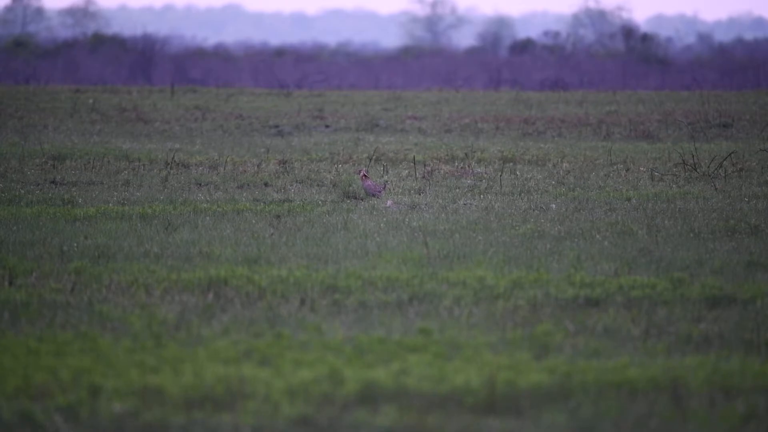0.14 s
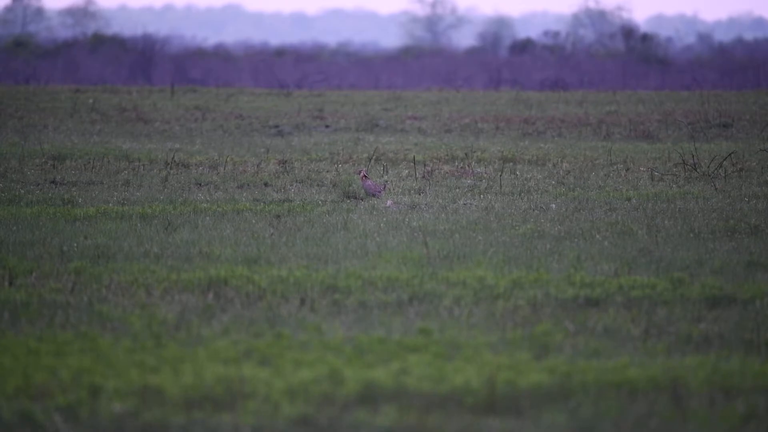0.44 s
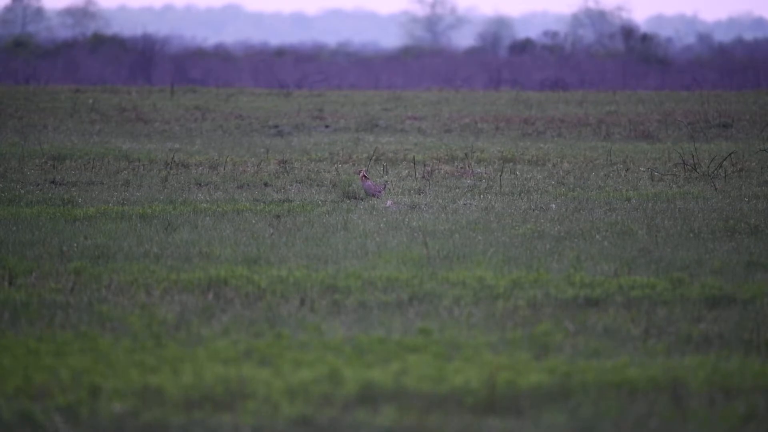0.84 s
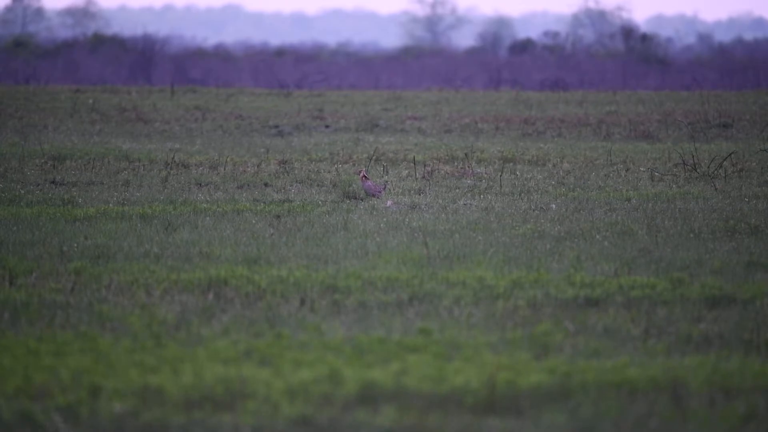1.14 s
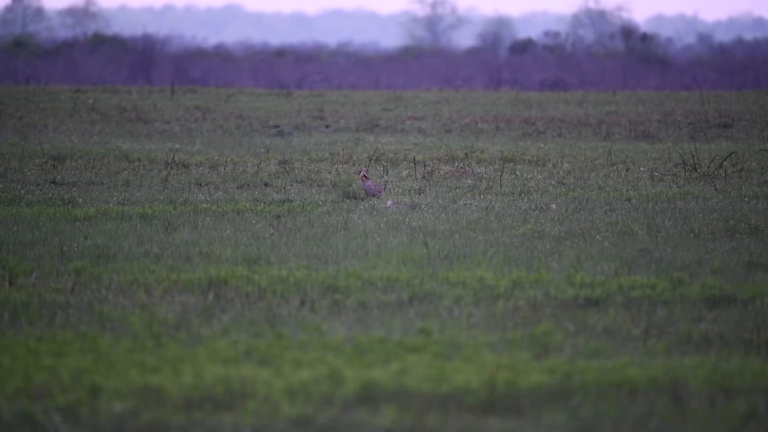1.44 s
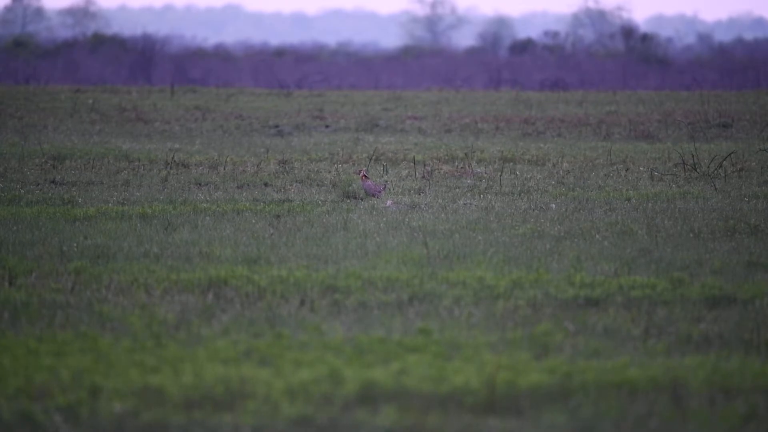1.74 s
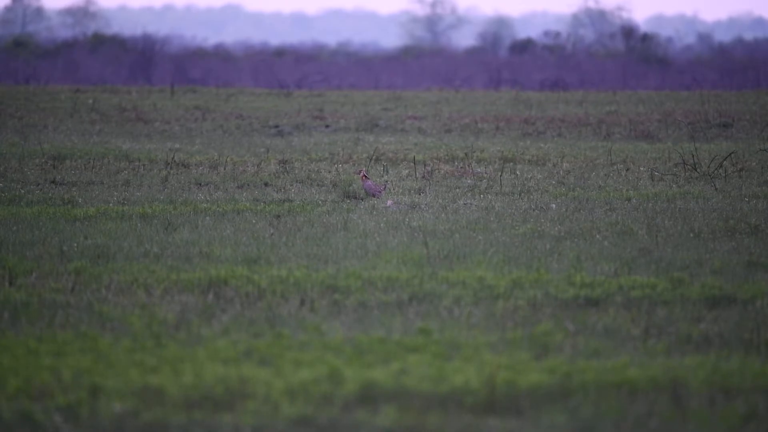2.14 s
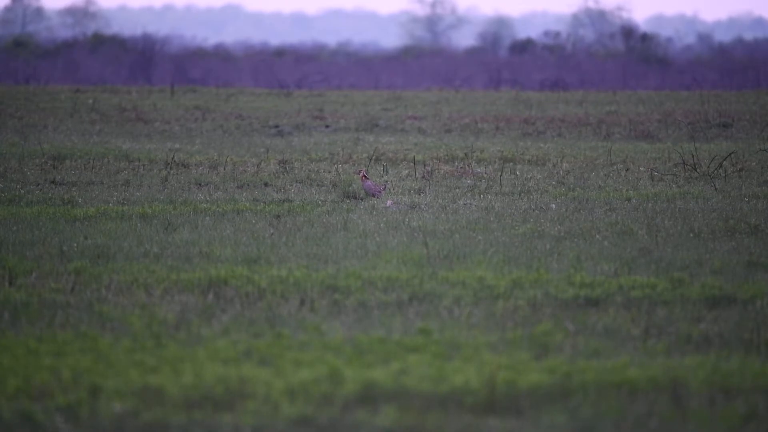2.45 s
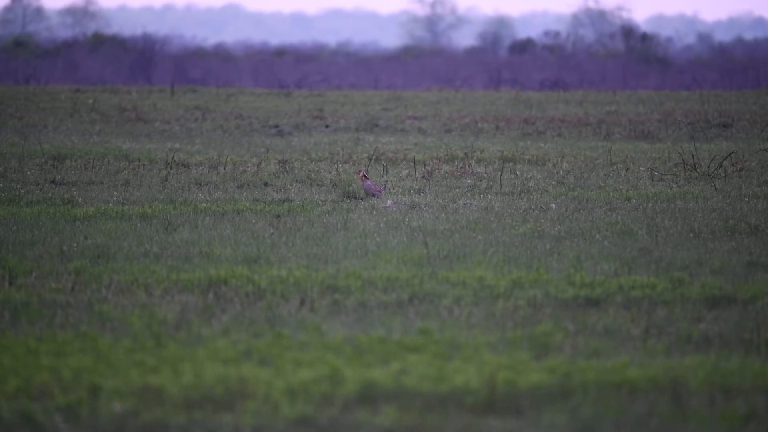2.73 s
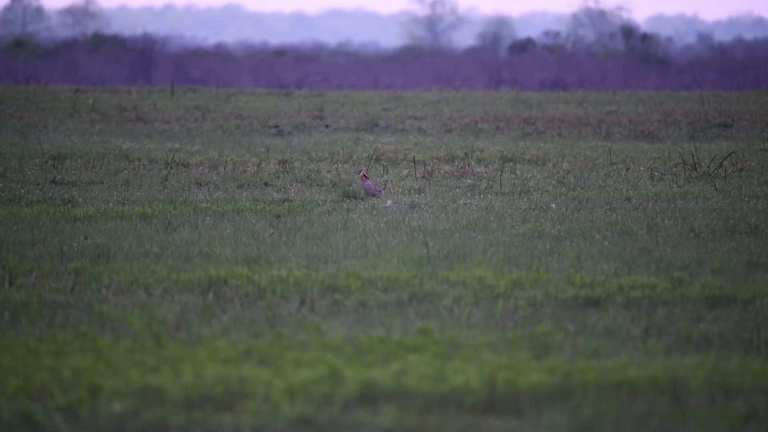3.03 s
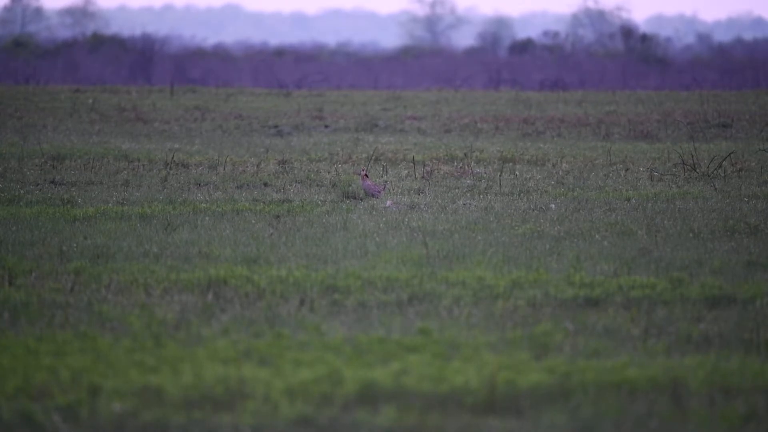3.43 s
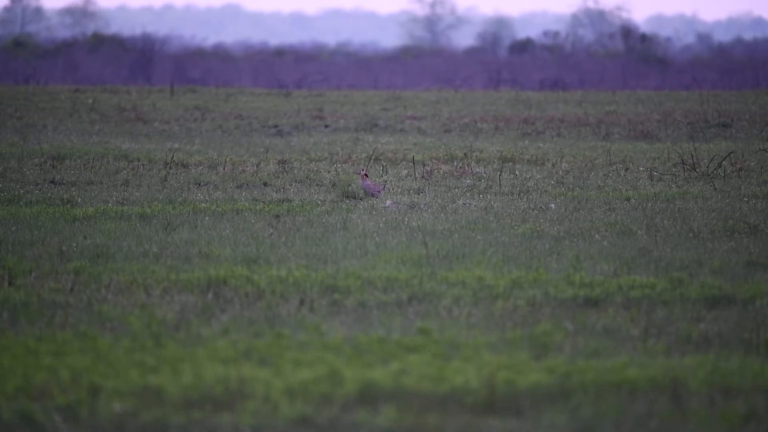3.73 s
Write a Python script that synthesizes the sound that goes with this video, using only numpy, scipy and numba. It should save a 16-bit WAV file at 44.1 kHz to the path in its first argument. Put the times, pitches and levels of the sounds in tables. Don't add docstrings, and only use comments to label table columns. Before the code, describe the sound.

Strong wind buffets a bare stereo microphone in an open field, thumping and crackling with overload; faint reedy bird calls, thin whistles and a cricket trill lie far behind, clearer as the wind eases before gusting again.

```python
import sys
import numpy as np
from scipy import signal
from scipy.fft import rfft, irfft
from scipy.io import wavfile
from scipy.ndimage import uniform_filter1d
from numba import njit

SR = 44100
rng = np.random.default_rng(int(sys.argv[2]) if len(sys.argv) > 2 else 0)


def dump_mix(stems):
    frames = np.atleast_2d(stems).T
    limited = np.clip(frames, -1, 1)
    pcm = np.round(limited * 32767).astype(np.int16)
    wavfile.write(sys.argv[1], SR, pcm)


def volts_from_decibels(level):
    exponent = np.asarray(level, float) / 20
    return 10 ** exponent


N = 171108


@njit
def svf(x, hz, k):
    y, b, l = np.empty((3, len(x))), 0., 0.
    for i in range(len(x)):
        g = np.tan(np.pi * hz[i] / SR)
        v = (b + g * (x[i] - l)) / (1 + g * (g + k))
        low = l + g * v
        y[0, i], y[1, i], y[2, i] = low, k * v, x[i] - k * v - low
        b, l = 2 * v - b, 2 * low - l
    return y


def tone(x, hz, damp, order):
    return svf(x, hz + np.zeros(N), 1. * damp)[order]


def unit(x):
    return x / np.sqrt(np.mean(x ** 2))


def smooth_twice(x, size):
    return uniform_filter1d(uniform_filter1d(x, size), size)


def walk(rate):
    hold = int(SR / rate)
    levels = np.repeat(rng.standard_normal(N // hold + 1), hold)
    return unit(smooth_twice(levels, hold)[:N])


def gate(t, start, length, edge):
    inside = np.minimum(t - start, start + length - t)
    return np.sin(np.pi / 2 * np.clip(inside / edge, 0, 1)) ** 2


def placed(x, pan_db, lag_s):
    late = np.roll(x, int(round(lag_s * SR)))
    return np.array([x * volts_from_decibels(pan_db / 2), late * volts_from_decibels(-pan_db / 2)])


def wind(t, eddies):
    calm_db = -35
    buffet_db, buffet_slope = -9, 0.75
    rumble_db, rumble_slope, rumble_hz, swell_db = -22, 0.3, 63.7, 3
    rustle_db, rustle_slope, rustle_hz = -47, 1, 580
    flutter_db, flutter_slope, flutter_hz = -27, .7, 260
    eddy_hz, eddy_oct_per_db, port_hz = 236, 0.09, 111.4
    steady = .7

    coarse_t = t[::44]
    gusts = sum(volts_from_decibels(db) * np.exp(-.5 * ((coarse_t - s) / w) ** 2) for s, db, w in eddies)
    force = 20 * np.log10(volts_from_decibels(calm_db) + gusts)
    force = np.interp(t, coarse_t, force) + 1.324 * walk(90)
    hz = eddy_hz * 2 ** (eddy_oct_per_db * force + 0.15 * walk(60))
    noise = rng.standard_normal((3, N))

    buffet = tone(noise[0] / np.sqrt(hz), hz, 1.0, order=0)
    buffet = tone(buffet, 1.648 * hz, 0.83, order=0)
    buffet = buffet / (smooth_twice(buffet ** 2, 700) + 1e-12) ** (steady / 2)
    buffet = tone(buffet, 2.59 * hz, 1.17, order=0)
    buffet = unit(tone(buffet, port_hz, 0.88, order=2))

    rumble = unit(tone(tone(noise[1], rumble_hz, 1.08, order=1), 170, 3.6, order=0))
    rustle = unit(tone(tone(noise[2], rustle_hz, 1.3, order=1), 1300, 6.9, order=0))

    flutter = noise[2, ::-1].copy()
    for _ in range(2):
        flutter = tone(flutter, flutter_hz, .6, order=1)
    for _ in range(2):
        flutter = tone(flutter, 1.5 * flutter_hz, 1.2, order=0)
    flutter = unit(flutter)

    out = flutter * volts_from_decibels(flutter_db + flutter_slope * force)
    out = out + buffet * volts_from_decibels(buffet_db + buffet_slope * force)
    out = out + rumble * volts_from_decibels(rumble_db + rumble_slope * force + swell_db * walk(7))
    return out + rustle * volts_from_decibels(rustle_db + rustle_slope * force + 3.1 * walk(90))


def jolts():
    # t/s, peak level/dB, left minus right/dB
    flaps = [(0.015, -36.5, -31), (0.1798, -21.5, -19), (0.2218, -27.5, 28), (0.3009, -24.5, 8.5),
             (0.765, -33.5, 12.5), (0.9222, -26.5, -4), (0.9558, -24.5, -9), (1.0076, -29, -1.5),
             (1.0384, -27, -6), (1.3925, -27, -6), (2.8286, -32, 8), (3.159, -27.5, -7.5),
             (3.2209, -29.5, -17), (3.272, -23, -5.5), (3.4245, -30, -1), (3.4439, -25, -4.5),
             (3.493, -28, -8), (3.6259, -36.5, -23.5), (3.6484, -34, -8), (3.715, -28.5, -0.5),
             (3.7573, -31.5, -22), (3.7704, -22, -12), (3.8268, -22.5, -5), (1.412, -24, -8),
             (1.438, -29, 8), (0.597, -31, 0), (0.652, -28, 8), (1.221, -27, -8)]
    swing_s, drive_db = 0.00074, 26.5
    hits, u = np.zeros((2, N)), np.arange(-200, 200) / SR / swing_s
    signs = np.sign(rng.standard_normal((len(flaps), 1)))
    for (s, db, pan_db), sign in zip(flaps, signs):
        port_db = np.minimum([pan_db, -pan_db], 0) * 2
        hits[:, int((s + swing_s) * SR)] = sign * volts_from_decibels(db + drive_db + port_db)
    return signal.fftconvolve(hits, [u * np.exp(-u ** 2 / 2)], "same")


def overload(x):
    limit, over_slope = 0.3525, 0.058
    domed = 2 * limit * np.tanh(x / limit / 2)
    return (1 - over_slope) * np.clip(x, -limit, limit) + over_slope * domed


def wader(t):
    # t/s, voice pitch f/Hz, level/dB
    calls = [
        [(.243, 320, -59), (.27, 339, -51.5), (.295, 309, -64), (.325, 488, -55), (.345, 556, -54.5),
         (.38, 650, -57), (.41, 780, -61), (.45, 789, -62), (.63, 813, -65)],
        [(1.48, 570, -66), (1.51, 732, -62), (1.55, 790, -81), (1.595, 750, -65), (1.604, 703, -80),
         (1.613, 440, -62), (1.65, 400, -59), (1.685, 350, -67)],
        [(1.845, 334, -68), (1.865, 387, -53.5), (1.884, 367, -63), (1.91, 505, -54), (1.935, 610, -58)],
        [(1.928, 590, -63), (1.955, 757, -55.5), (2.0, 801, -59.5), (2.1, 817, -55.5), (2.25, 803, -56),
         (2.325, 750, -53.5), (2.355, 580, -54), (2.412, 463, -57)],
    ]
    throat_hz, throat_width_hz = 2170, 510
    rasp_hz, rasp_db = 502, -9.5
    out = 0
    for call in map(np.array, calls):
        times, pitches, levels = call.T
        hz = np.interp(t, times, pitches)
        hz = uniform_filter1d(hz, size=500) * (1 + 0.004 * walk(90))
        phase = 2 * np.pi * np.cumsum(hz) / SR
        voice = 0
        for k in range(2, 10):
            throat = np.exp(-.5 * ((k * hz - throat_hz) / throat_width_hz * 2) ** 2)
            voice = voice + np.sin(k * phase) * throat
        rasp = 2 * np.pi * np.cumsum(rasp_hz * (1 + 0.22 * walk(200))) / SR
        undertones = sum(np.sin(3 * phase - k * rasp) / k for k in range(1, 3))
        voice = voice + volts_from_decibels(rasp_db) * np.clip(hz / 100 - 7, 0, 1) * undertones
        level = volts_from_decibels(np.interp(t, times, levels) + 1.5 + 2.0 * walk(40.17))
        out = out + voice * level * gate(t, times[0], np.ptp(times), 0.0064)
    return out


def songbird(t):
    # t/s, length/s, start f/Hz, end f/Hz, level/dB
    whistles = [(0.337, 0.096, 3520, 3400, -68), (0.434, 0.06, 3390, 3310, -57),
                (0.487, 0.265, 3235, 2884, -52), (0.931, 0.055, 4630, 4360, -64.5),
                (1.068, 0.032, 3960, 3820, -58), (1.1, 0.021, 3870, 3860, -60),
                (1.143, 0.088, 3140, 3010, -56), (1.358, 0.021, 3000, 2920, -62.5),
                (1.419, 0.037, 2970, 2980, -58.5), (1.46, .045, 2980, 2990, -67),
                (2.744, 0.027, 1950, 2150, -61)]
    out = 0
    for s, length, hz0, hz1, db in whistles:
        hz = hz0 + (hz1 - hz0) * np.clip((t - s) / length, 0, 1) ** 0.7
        note = np.sin(2 * np.pi * np.cumsum(hz) / SR)
        out = out + note * volts_from_decibels(db + 4.5 - 12 * (t - s)) * gate(t, s, length, .008)
    return out * volts_from_decibels(1.3 * walk(32))


def cricket():
    # t/s, length/s, level/dB
    bouts = [
        (0.004, .448, -64),
        (.682, .547, -64),
        (1.524, .392, -68),
        (2.127, .579, -63),
        (2.885, .7, -63),
        (3.755, .14, -64),
    ]
    stroke_s, stroke_hz, drop_hz, overtone_db = 0.0077, 4733, 378, -20.5
    first_gap_s, last_gap_s = .0143, .0162
    out, u = np.zeros(N + SR), np.arange(int(1.5 * stroke_s * SR)) / SR
    for s, length, db in bouts:
        gaps = np.linspace(first_gap_s, last_gap_s, int(2 * length / (first_gap_s + last_gap_s)))
        gaps = gaps * length / gaps.sum()
        times = s + np.r_[0, np.cumsum(gaps[:-1]), gaps.sum() + first_gap_s]
        for time, (a, b, c) in zip(times, rng.standard_normal((len(times), 3))):
            span = stroke_s * np.clip(1 + 0.2 * a, .6, 1.45)
            phase = 2 * np.pi * (stroke_hz * u - drop_hz * u ** 2 / span / 2)
            stroke = np.sin(phase) + volts_from_decibels(overtone_db) * np.sin(2 * phase)
            i = max(int((time + 0.00082 * c) * SR), 0)
            out[i:i + len(u)] += stroke * gate(u, 0, span, 0.00087) * volts_from_decibels(db + 8.5 + 2 * b)
    return out[:N]


def field():
    # f/Hz, level per Hz/dB
    hiss_curve = np.array([(300, 0.5), (700, -5.5), (2000, -7.5), (3600, -10.5), (6000, -11.5),
                           (15000, -15)])
    f = np.arange(N // 2 + 1) * SR / N + 1
    shape = volts_from_decibels(np.interp(np.log(f), np.log(hiss_curve[:, 0]), hiss_curve[:, 1]))
    shape = shape * np.minimum(f / 300, 1) ** 2
    hiss = irfft(rfft(rng.standard_normal((2, N))) * shape, N)
    return unit(hiss) * volts_from_decibels(-59)


def scattered(far):
    echo_db, t60_s = -11, .3
    far = far + volts_from_decibels(-13.5) * np.roll(far, int(0.0087 * SR), axis=1)
    u = np.arange(SR // 4) / SR
    tail = rng.standard_normal((2, len(u))) * volts_from_decibels(-60 * u / t60_s)
    tail = unit(tail) / np.sqrt(len(u))
    return far + volts_from_decibels(echo_db) * signal.fftconvolve(far, tail, axes=1)[:, :N]


def scene():
    # t/s, strength level/dB, half length/s
    left_eddies = [(0.025, -14, 0.0081), (0.107, -3, 0.022), (0.155, -15.5, 0.004), (0.217, -6.5, 0.052),
                   (0.304, -2.5, 0.008), (0.381, -11.5, 0.031), (0.42, -14, 0.016), (0.479, -7.5, 0.0093),
                   (0.529, -7, 0.013), (0.633, -5, 0.052), (0.672, -11.5, 0.0036), (0.724, -7.5, 0.008),
                   (0.763, -6.5, 0.011), (0.805, -4, 0.012), (0.857, -12, 0.016), (0.93, -9.5, 0.013),
                   (0.983, -7.5, 0.005), (1.006, -8.5, 0.022), (1.093, -22, 0.01), (1.152, -15.5, 0.015),
                   (1.197, -6.5, 0.009), (1.228, -13.5, 0.023), (1.308, -18.5, 0.012), (1.36, -14.0, 0.024),
                   (1.414, -4, 0.0058), (1.455, -4.5, 0.017), (1.525, -7, 0.0093), (1.685, -9.5, 0.015),
                   (1.712, -11, 0.007), (1.765, -14, 0.027), (1.843, -20, 0.0087), (1.951, -17.5, 0.012),
                   (2.003, -14.5, 0.01), (2.093, -16.0, 0.014), (2.151, -10, 0.0099), (2.175, -9.5, 0.0094),
                   (2.202, -18, 0.0058), (2.234, -12.5, 0.014), (2.293, -24.5, 0.023),
                   (2.351, -10.5, 0.014), (2.402, -14.5, 0.0086), (2.459, -18, 0.0092),
                   (2.594, -17.5, 0.027), (2.659, -16.5, 0.005), (2.688, -32, 0.005), (2.702, -33.0, 0.037),
                   (2.821, -9, 0.015), (2.894, -26, 0.02), (3.077, -40.5, 0.053), (3.139, -16.5, 0.011),
                   (3.177, -6.5, 0.011), (3.286, -4, 0.037), (3.36, -10, 0.046), (3.436, -6.5, 0.012),
                   (3.538, -10, 0.034), (3.606, -9.0, 0.021), (3.665, -7.5, 0.015), (3.716, -6.5, 0.01),
                   (3.76, -9.5, 0.028), (3.855, -6.0, 0.017)]
    # t/s, strength level/dB, half length/s
    right_eddies = [(0.02, -5, 0.011), (0.048, -5.5, 0.0086), (0.092, -2, 0.015), (0.186, -4.5, 0.015),
                    (0.313, -14.5, 0.017), (0.36, -10.5, 0.013), (0.421, -19, 0.017), (0.476, -7, 0.014),
                    (0.519, -20, 0.007), (0.55, -11.5, 0.0067), (0.592, -10.5, 0.027),
                    (0.621, -11.5, 0.0046), (0.666, -4.5, 0.0069), (0.713, -18, 0.018),
                    (0.744, -22.5, 0.0044), (0.769, -16.5, 0.008), (0.802, -10, 0.0078),
                    (0.831, -8.0, 0.0092), (0.909, -11.5, 0.028), (0.978, -7, 0.034), (1.045, -6.5, 0.018),
                    (1.235, -3.5, 0.078), (1.404, -2, 0.014), (1.451, -14, 0.013), (1.49, -14, 0.036),
                    (1.545, -6.0, 0.016), (1.609, -18, 0.013), (1.665, -21, 0.012), (1.79, -8.5, 0.046),
                    (1.899, -26, 0.0095), (1.961, -20.5, 0.022), (2.005, -12.5, 0.01),
                    (2.046, -21.5, 0.008), (2.09, -11, 0.0041), (2.202, -7.0, 0.063),
                    (2.297, -11.5, 0.0041), (2.386, -14, 0.019), (2.431, -14, 0.01), (2.493, -30.5, 0.019),
                    (2.588, -28, 0.029), (2.647, -32.0, 0.014), (2.831, -16.0, 0.02), (2.895, -14.5, 0.015),
                    (2.966, -15, 0.014), (3.022, -29, 0.0049), (3.076, -12.5, 0.0067), (3.106, -10, 0.0067),
                    (3.162, -7, 0.014), (3.23, -8.5, 0.01), (3.287, -7.5, 0.01), (3.302, -9.0, 0.088),
                    (3.427, -3.5, 0.023), (3.527, -4.5, 0.032), (3.611, -6.5, 0.04), (3.653, -9, 0.015),
                    (3.699, -9, 0.006), (3.724, -5.5, 0.0073), (3.766, -3, 0.023), (3.831, -1.5, 0.0083),
                    (3.861, -2.5, 0.013)]
    widen, widen_hz, lift = .9, 4500, .9
    t = np.arange(N) / SR
    ports = overload(np.array([wind(t, left_eddies), wind(t, right_eddies)]) + jolts())
    treble = np.array([tone(p, widen_hz, 2.1, order=2) for p in ports])
    ports = ports + lift * treble - widen * treble[::-1]
    far = placed(wader(t), -.5, .00003)
    far = far + placed(songbird(t), -8.0, .00013)
    far = far + placed(cricket(), -8, .00011)
    return ports * gate(t, -1, 1 + N / SR, .003) + scattered(far) + field()


def top_cut(x):
    return signal.sosfilt(signal.butter(12, 15830, fs=SR, output="sos"), x)


def record(dry):
    coupling_hz = 12
    mix = signal.lfilter(*signal.butter(1, coupling_hz, "high", fs=SR), dry)
    return top_cut(mix)


dry = scene()
out = record(dry)
dump_mix(out)
```